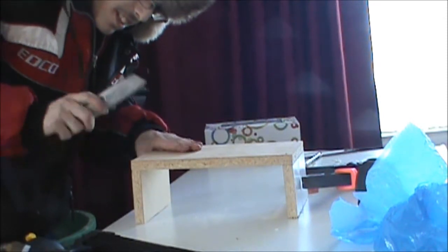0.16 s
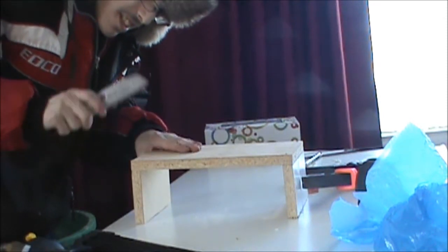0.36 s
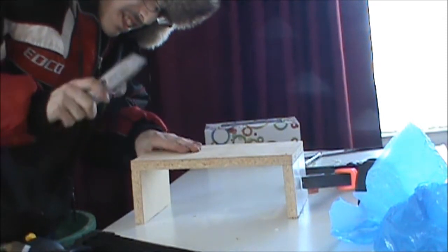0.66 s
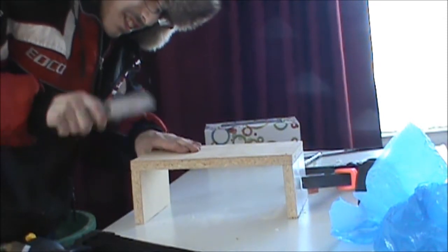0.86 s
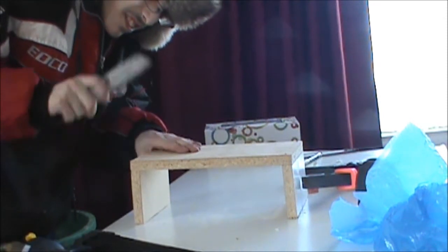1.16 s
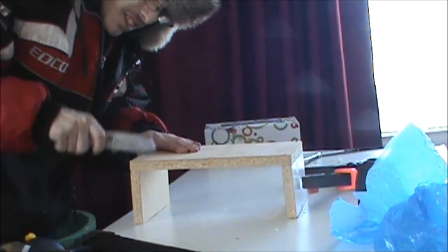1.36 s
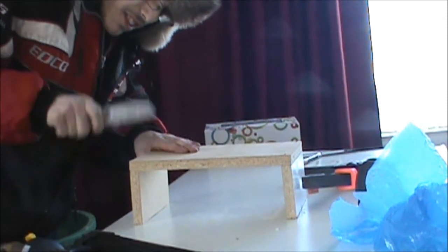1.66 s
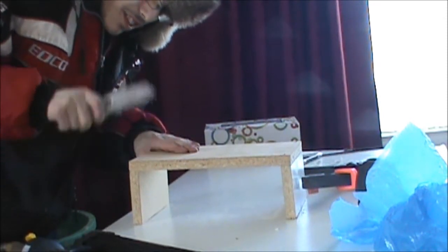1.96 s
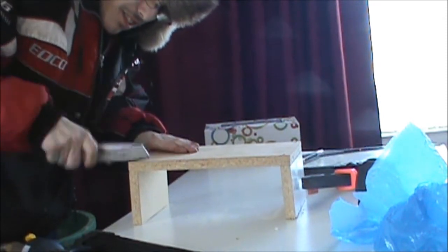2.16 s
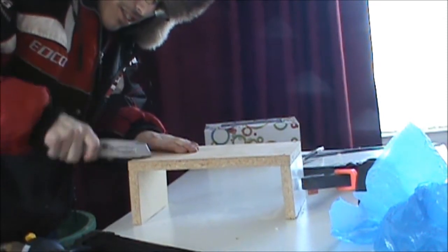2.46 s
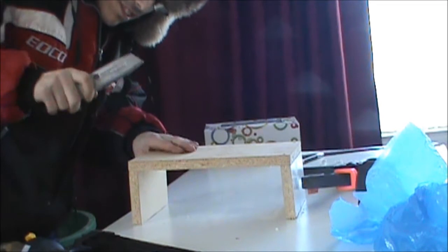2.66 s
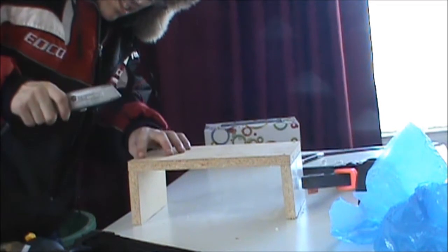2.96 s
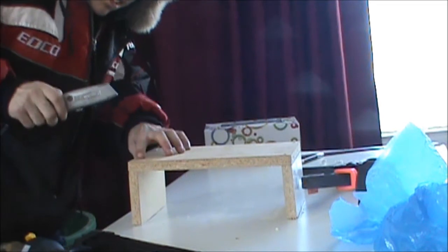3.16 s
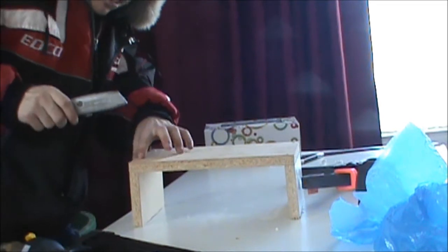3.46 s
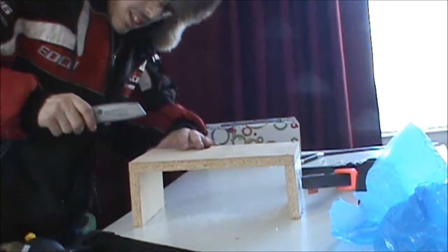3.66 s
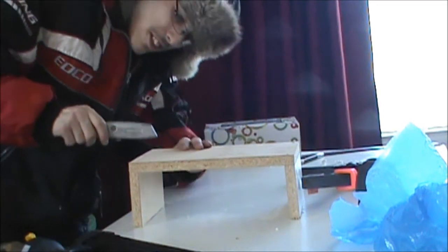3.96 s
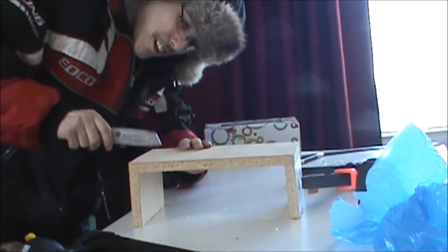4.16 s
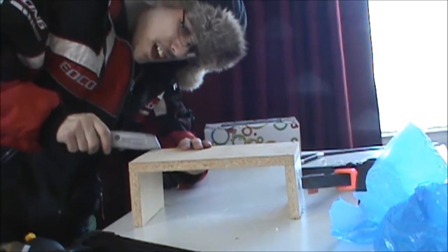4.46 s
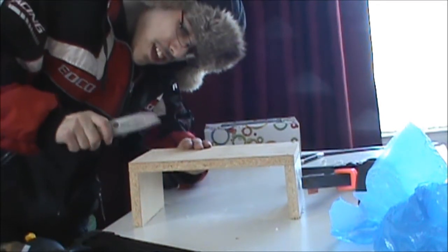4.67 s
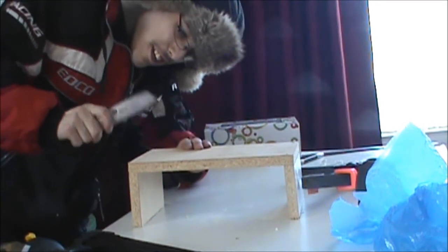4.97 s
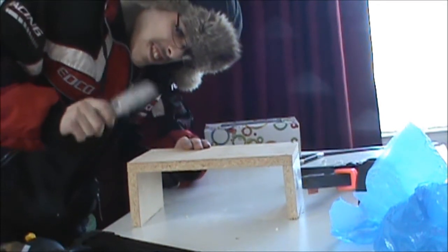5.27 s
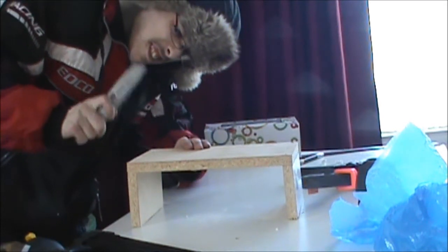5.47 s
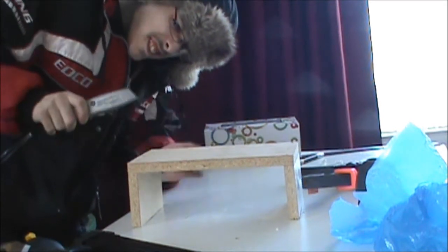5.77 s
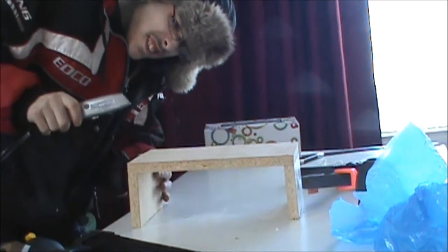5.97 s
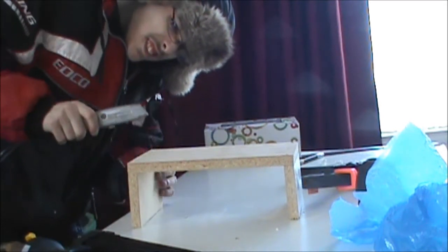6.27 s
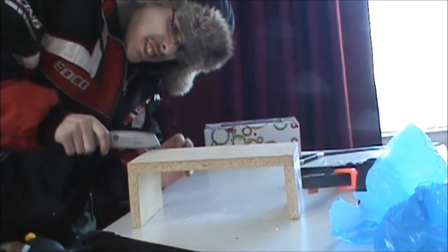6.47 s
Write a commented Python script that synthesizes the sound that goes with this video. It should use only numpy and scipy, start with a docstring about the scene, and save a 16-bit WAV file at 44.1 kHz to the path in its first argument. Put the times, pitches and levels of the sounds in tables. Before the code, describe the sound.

Close up in a small workroom, a steel tool clinks, then strikes a hollow chipboard bench in an even run of loud, boomy knocks. A hand rubs and bumps the wood in the pause. A bright steel clink opens a faster run that grows louder and sharper, then stops. Faint room hum remains, with light handling and one small knock.

```python
"""Two quick runs of hammer blows on a small chipboard bench, then one light knock, in a workroom.
Each blow adds a dry knock, the bench ringing in the room, a bass boom and the click and song of steel.
The steel tool also clinks and ticks on its own: short cracks of noise with a few dying tones.
A hand and sleeve rub and bump the board (shaped noise) over a quiet room of noise and steady hum.
A limiter flattens the loud blows, so the room swells up behind them."""
import sys
import numpy as np
from scipy import signal
from scipy.fft import rfft, irfft, next_fast_len
from scipy.io import wavfile
from scipy.ndimage import map_coordinates

SR = 44100
rng = np.random.default_rng(int(sys.argv[2]) if len(sys.argv) > 2 else 0)


def generate_wav(signal):
    """Clip the signal to [-1, 1] and save it as 16-bit WAV at the path in sys.argv[1]."""
    frames = np.transpose(np.atleast_2d(signal))
    scaled = np.clip(frames, -1, 1) * 32767
    pcm = np.round(scaled).astype(np.int16)
    wavfile.write(sys.argv[1], SR, pcm)


N = 291942
LENGTH = SR * 3 // 4  # samples in one short sound
AGE = np.arange(LENGTH) / SR  # seconds since that sound began

# blows on the board: (time [s], force [dB], dry knock before its common level [dB], centre of the knock [Hz])
BLOWS = [(.001, -50, -33, 700), (0.243, .5, -3, 804), (0.5071, 2, 6, 1000), (0.7659, 3, 2, 1100),
         (1.033, 0, 2.5, 1200), (1.305, 1.5, 6, 962), (1.5791, 1.5, 0, 1198), (1.8586, 1.5, -1.5, 1222),
         (2.1409, -0.85, 1, 1207), (2.4195, 1, -1.5, 1190), (4.2892, -19.5, 12.5, 3390),
         (4.4275, -11, -8, 726), (4.5768, -7.5, -15.5, 825), (4.7201, -6.5, 4, 866), (4.87, -5, 6, 1057),
         (5.0265, -2.5, 7, 1263), (5.181, -1.2, 10, 1815), (5.3427, -0.8, 7, 2097),
         (5.4998, -3, 13.5, 2090), (6.484, -37, 5.5, 2100)]
# ringing tones of the bench, with their relative level for a blow at each spot:
# (frequency [Hz], end [dB], middle [dB], in between [dB], near edge [dB])
BOARD = [(75.6, -10.5, -18, -13.5, -18), (108.6, -4, -11.5, 1, -10.5), (140.5, 1, -4, 1, -1),
         (172, -19.5, -11.5, -2.5, -1.5), (221, -15.5, -18.5, -23, -2.5), (366.8, -7.5, -11.5, -3, 6),
         (408.3, 2.5, -4.5, -1, 8), (426, -17.5, -9.5, 4, -6), (466.3, -1.5, 7.5, 1, 8.5),
         (510, 9.5, 3.5, 7, 3), (671.6, 3.5, -17.5, -11, -8), (725, -14.5, -10.5, -6, -13),
         (759.5, -7, -5.5, 3.5, -27), (810, -10, -4, -3, -7.5), (855, -4.5, -2, -3, -6),
         (960, -2.5, -13.5, -13.5, -2.5), (1048, 3, 3, 0, 3), (1282, 0, -20.5, -2, -27),
         (1547, -17.5, -25.5, -4.5, -14.5), (1593, -2, -23.5, 1.5, -10), (1640, -32, -21.5, -9, -15),
         (1720, 4.5, -23, -9.5, -23), (1954, 4, -19.5, -6, -2), (2038, -1, -13, -4.5, 2),
         (2088, -3.5, -2, -13.5, -7), (3040, -13, 2, -23, -7), (4140, -6, -4, -15.5, -22),
         (4220, -18.5, -7.5, -14, -28)]
# how long the room sound takes to die by 60 dB: (frequency [Hz], decay time [s])
ROOM = [(60, 0.52), (150, 0.23), (420, 0.33), (1100, 0.3), (2500, 0.33), (5000, 0.31), (9000, 0.24),
        (15000, 0.19)]


def amp(db):
    """Turn decibels into a gain."""
    return 10 ** (np.asarray(db) / 20)


def unit(x):
    """Scale a sound to an rms level of 1."""
    return x / np.sqrt(np.mean(x ** 2) + 1e-20)


def along(points, hz):
    """Read a (frequency, value) curve, with frequency on a log axis as we hear it."""
    f, v = np.transpose(points)
    return np.interp(np.log(hz + 1), np.log(f + 1), v)


def fade(t60, t=AGE):
    """Exponential decay that has lost 60 dB after t60 seconds."""
    return np.exp(-np.log(1000) * t / t60)


def add(track, s, sound):
    """Mix a stereo sound into the track, starting at s seconds."""
    start = max(round(s * SR), 0)
    part = track[:, start:][:, :sound.shape[-1]]
    part += sound[..., :part.shape[1]]


def band(x, low_hz, high_hz):
    """The part of a sound between two frequencies, without delaying it."""
    sos = signal.butter(2, [low_hz, high_hz], "band", fs=SR, output="sos")
    return signal.sosfiltfilt(sos, x, padtype=None)


def noise(spectrum, size):
    """Coloured stereo noise of rms 1; the two channels are less alike where the room mixes them more."""
    # likeness of the two channels: (frequency [Hz], coherence [0 to 1])
    likeness = [(100, 0.93), (300, 0.79), (600, 0.6), (2000, .63), (5000, 0.35), (12000, 0.62)]
    hz = np.fft.rfftfreq(size, 1 / SR)
    turn = np.arccos(np.clip(along(likeness, hz), 0, 1)) / 2
    shares = [np.cos(turn), np.sin(turn)]  # shared middle, opposed sides
    white = rfft(rng.standard_normal((2, size)))
    mid, side = irfft(white * amp(along(spectrum, hz)) * shares, size)
    return unit(np.array([mid + side, mid - side]))


def ripple(spectrum, depth_db, spacing_hz):
    """Tones bunch together: random peaks and valleys on a smooth curve, at full depth above 2 kHz."""
    hz = np.linspace(0, SR / 2, 4096)
    peaks = map_coordinates(rng.standard_normal(2048), [hz / spacing_hz], mode="mirror")
    depth = depth_db * np.minimum(hz / 2000, 1)
    return np.column_stack([hz, along(spectrum, hz) + depth * peaks])


def swell(hz, t):
    """Echoes take time to gather, so each pitch builds up at its own speed."""
    # time constant of the build-up: (frequency [Hz], time [s])
    build_up = [(110, 0.01), (250, 0.007), (480, 0.031), (900, 0.0043), (1500, 0.0024), (3000, .001)]
    return 1 - np.exp(-(t + 0.0012) / along(build_up, hz)[:, None])


def reverberant(spectrum):
    """Noise for a crowd of weak tones, each pitch swelling and dying at the room's speed."""
    hz, t, z = signal.stft(noise(spectrum, LENGTH), SR, nperseg=512)
    shaped = z * swell(hz, t) * fade(along(ROOM, hz)[:, None], t)
    return signal.istft(shaped, SR, nperseg=512)[1][:, :LENGTH]


def ring(hz, db, t60, spread):
    """Dying tones (damped modes); the higher ones differ more in phase between the channels."""
    phase = rng.uniform(0, 2 * np.pi, (len(hz), 1))
    skew = spread * rng.standard_normal((len(hz), 1)) * np.minimum(hz / 700, 1)[:, None]
    decay = amp(db)[:, None] * fade(t60[:, None]) * swell(hz, AGE)
    turning = 2 * np.pi * hz[:, None] * AGE + phase
    return np.array([(decay * np.sin(turning + side * skew)).sum(0) for side in (-1, 1)])


def room_tone(air_db=-59):
    """The quiet room: low rumble and hiss from shaped noise, and a faint hum of steady tones."""
    # colour of the air noise: (frequency [Hz], relative level [dB per Hz])
    air_colour = [(25, -21), (60, -17), (110, -3.5), (190, -15.5), (300, -21.5), (380, -14.5), (480, -19),
                  (1000, -21.5), (2000, -24.5), (4750, -28), (9500, -27), (15000, -27)]
    # steady electrical tones: (frequency [Hz], level [dB])
    hum_tones = [(113, -75.5), (371.4, -72), (15735, -79)]
    t = np.arange(N) / SR
    hum = sum(np.sqrt(2) * amp(db) * np.sin(2 * np.pi * hz * t) for hz, db in hum_tones)
    return amp(air_db) * noise(air_colour, N) + hum


def handling(bump_db=5, sleeve_db=-1, ripple_db=2):
    """Hand and sleeve: rubs swell and fade in uneven scuffs; bumps are low thuds, heel then fingers."""
    # rubs: (middle [s], width of the swell [s], level before sleeve_db [dB], tilt [dB per octave])
    rubs = [(.06, 0.84, -44.5, 0.5), (3.087, .16, -50, -2), (3.271, 0.14, -47.5, -1),
            (3.46, 0.073, -49.5, 0.5), (3.68, 0.22, -56.5, -1), (3.945, .24, -56, 0),
            (6.307, 0.097, -58.5, 4.5), (6.497, 0.23, -59, -2)]
    # colour of the cloth before its tilt: (frequency [Hz], relative level [dB per Hz])
    cloth_colour = [(100, 0.5), (500, 0), (1500, -6.5), (3000, -12), (10000, -16.5), (16000, -22)]
    # the hand comes down on the bench: (time [s], level before bump_db [dB])
    bumps = [(3.063, -44), (3.374, -43), (3.418, -46.5), (3.795, -53), (5.944, -52), (6.584, -49.5)]
    # colour of a bump: (frequency [Hz], relative level [dB per Hz])
    bump_colour = [(24, -51), (40, 3), (70, -49), (102, -6), (165, 4), (212, -14), (366, -14), (900, -30),
                   (1170, -52), (1980, -120)]
    fingers_lag_s, fingers_db = .035, -7  # the fingers follow the heel of the hand
    scuff_db = 2.5  # unevenness of a rub
    t = np.arange(N) / SR
    scuffs = map_coordinates(rng.standard_normal(400), [t * 28], mode="mirror")
    out = np.zeros((2, N))
    for s, length, db, tilt in rubs:
        tilted = [(hz, level + tilt * np.log2(hz)) for hz, level in cloth_colour]
        cloth = ripple(tilted, ripple_db, spacing_hz=285)
        stroke = np.exp(-2 * ((t - s) / length) ** 2)
        rustle = noise(cloth, next_fast_len(N))[:, :N]
        out += amp(db + sleeve_db + scuff_db * scuffs) * stroke * rustle
    for s, db in bumps:
        for lag, touch_db in [(0, 0), (fingers_lag_s, fingers_db)]:
            thud = noise(bump_colour, LENGTH) * fade(0.31) * (1 - np.exp(-AGE / 0.0023))
            add(out, s + lag, amp(db + touch_db + bump_db) * thud)
    return out


def steel(ring_db, crack_t60, room_db):
    """One contact of the tool: a short crack of noise, the steel's own ring and a little room."""
    # tones of the tool: (frequency [Hz], level before a random change [dB], decay time [s])
    steel_tones = [(2860, -13, .08), (3750, -11, .08), (4110, -8, .1), (4400, -5, .09), (4900, -6, .1),
                   (5050, -5, .04), (5500, -8, .09), (5620, -6, .08), (6340, -7, .09), (8300, -10, .09),
                   (9140, -10, .1), (9900, -6, .1), (10830, -5, .08), (13176, -11, .08), (14800, -15, .08)]
    # crack of steel meeting wood: (frequency [Hz], relative level [dB per Hz])
    crack_colour = [(300, -29), (2000, -11.5), (4000, -2.5), (6000, 3.5), (8000, -3), (10500, 3),
                    (13000, -4), (16000, -10.5)]
    hz, db, t60 = np.transpose(steel_tones)
    modes = ring(hz, db + rng.normal(0, 2, len(hz)), t60, spread=0.1)
    crack = noise(crack_colour, LENGTH) * fade(crack_t60)
    direct = 0.42 * crack.mean(0) + 0.2 * crack  # mostly central
    return direct + amp(ring_db) * modes + amp(room_db) * reverberant(crack_colour)


def spot(spectrum, mode_db, crowd_db, ring_db, dry_ring_db, ripple_db):
    """The bench struck at one spot: its long ring in the room, its short dry knock, and its colour."""
    # dry knock under the tool: (frequency [Hz], relative level [dB per Hz])
    knock_colour = [(100, -25), (400, -13), (800, -22), (1200, -1), (2000, 2), (3000, -19), (5000, -19.5),
                    (15000, -54)]
    hz = np.transpose(BOARD)[0]
    colour = ripple(spectrum, ripple_db, spacing_hz=71.3)
    modes = ring(hz, mode_db, 0.86 * along(ROOM, hz), spread=0.1)
    dry_modes = ring(hz, mode_db, np.full(len(hz), .12), spread=0.17)
    dry_noise = noise(ripple(knock_colour, ripple_db, spacing_hz=119), LENGTH) * fade(0.027)
    knock = dry_noise + amp(dry_ring_db) * dry_modes
    answer = amp(crowd_db) * reverberant(colour) + amp(ring_db) * modes
    return answer, knock, colour


def hammering(fresh_db=-3, click_db=0, dry_db=-4, bass_db=3, boom_db=-34, click_rise_s=0.00015):
    """Blows set the board ringing; the first on a spot click and sing most, dry ones sound less hollow."""
    # when the tool moves to the board's end, its middle, a spot between them, and its near edge: [s]
    moves = [0, 4, 4.65, 6]
    # crowds of weaker tones at those four spots, each: (frequency [Hz], relative level [dB per Hz])
    at_end = [(24, -59.5), (40, -31.5), (103, -1.5), (247, -4), (325, -6.5), (377, 4), (484, 0.5),
              (522, 2.5), (577, -1), (670, 0.5), (1190, -3), (2060, -2.5), (7520, -27), (10900, -22.5),
              (15500, -32.5)]
    at_middle = [(24, -69.5), (40, -34.5), (106, -5), (280, -13.5), (461, -2.5), (548, -11), (859, -13),
                 (2640, -21), (2990, -17), (4030, -14), (5170, -29), (5720, -19), (7710, -25),
                 (12100, -28.5), (15500, -33.5)]
    between = [(24, -57.5), (40, -24.5), (103, -0.5), (150, 3.5), (235, -4.5), (317, -2.5), (359, 2),
               (522, 2.5), (562, 1.5), (740, 1.5), (1380, -1), (1960, -2.5), (7710, -21.5), (10900, -21.5),
               (15500, -26)]
    at_edge = [(50, -23), (130, 1), (250, -4), (450, 8.5), (800, -4.5), (2100, -7), (3100, -8),
               (4000, -16.5), (5500, -11), (9000, -39), (15000, -42)]
    # tone at those spots, before the shared settings and changes from blow to blow:
    # (thump [dB], hollow body [dB], click [dB], singing [dB])
    tones = [(-2.5, -4, -0.5, -20), (-3.5, -5, 3.5, -10), (-2.5, -0.5, 0.5, -16.5), (-4, -2, -13, -37)]
    # the tool sings on after a blow: (frequency [Hz], relative level [dB], decay time [s])
    song = [(3079, -6, .28), (4113, 0, .36), (4290, -2, .36), (6320, -11, .35)]
    # bass boom that lingers under each blow: (frequency [Hz], relative level [dB per Hz])
    boom_colour = [(40, -28.5), (80, -11.5), (110, -2), (155, 2), (230, -19.5), (450, -26.5), (900, -48),
                   (2000, -90.5)]
    # the first blow on a spot is hollower and clicks more; this wears off over a few blows
    first_body_db, first_click_db, settle_blows = 3.5, 10, 5.4
    body_per_knock = .22  # dB of hollow body lost for each dB of dry knock
    centre_db, centre_octaves = 2, 0.45  # lift and half width of the band around the knock's centre

    _, end_db, middle_db, between_db, edge_db = np.transpose(BOARD)
    spots = [spot(at_end, end_db, crowd_db=3.0, ring_db=-14.5, dry_ring_db=-13.5, ripple_db=2.0),
             spot(at_middle, middle_db, crowd_db=3, ring_db=-9.5, dry_ring_db=-6.5, ripple_db=1.0),
             spot(between, between_db, crowd_db=1, ring_db=-11.0, dry_ring_db=-23, ripple_db=1.0),
             spot(at_edge, edge_db, crowd_db=-9.5, ring_db=-19, dry_ring_db=-2.5, ripple_db=2.5)]
    places = np.searchsorted(moves[1:], np.transpose(BLOWS)[0])
    out = np.zeros((2, N))
    for k, (s, force_db, knock_db, centre_hz) in enumerate(BLOWS):
        answer, knock, colour = spots[places[k]]
        thump_db, body_db, bright_db, singing_db = tones[places[k]]
        blows_before = np.sum(places[:k] == places[k])
        early = np.exp(-blows_before / settle_blows)
        # a small shift of the contact point brings fresh sound above the lowest tones
        fresh = band(reverberant(colour), 300, 14000)
        wood = answer + amp(fresh_db) * fresh + amp(dry_db + knock_db) * knock
        width = 2 ** centre_octaves
        wood = wood + (amp(centre_db) - 1) * band(wood, centre_hz / width, centre_hz * width)
        singing = amp(singing_db) * early * ring(*np.transpose(song), spread=.4)
        # a gain minus 1, added to the wood, lifts or lowers just that band
        thump = (amp(thump_db + bass_db) - 1) * band(wood, 30, 220)
        hollow_db = body_db + first_body_db * early - body_per_knock * knock_db
        body = (amp(hollow_db) - 1) * band(wood, 210, 940)
        boom = amp(boom_db) * noise(boom_colour, LENGTH) * fade(0.88)
        click = steel(ring_db=-22.5, crack_t60=0.014, room_db=-16.5)
        click = amp(click_db + bright_db + first_click_db * early) * click
        blow = wood + thump + body + boom + singing
        add(out, s, amp(force_db) * blow * (1 - np.exp(-AGE / 0.00042)))
        add(out, s + .0006, amp(force_db) * click * (1 - np.exp(-AGE / click_rise_s)))
    return out


def clinks(level_db=1, tick_ring_db=-27):
    """Loose steel clinks, and dull ticks on wide swings: at the turn and just before the blow."""
    # single clinks and bounces of the tool: (time [s], level before level_db [dB])
    clink_times = [(.1595, -17.5), (.1685, -13.5), (.2365, -16.5), (3.0516, -49), (4.292, -4),
                   (6.615, -35.5)]
    # the arm swings high between these two times: [s]
    wide_swings = (.9, 2.6)
    rattle_lead_s, rattle_db = .058, -31  # the tool rattles at the turn of a wide swing
    graze_lead_s, graze_db = .0057, -24  # and grazes the board just before it lands
    tick_scatter_db = 2  # random spread of the ticks' strength
    swings = [s for s, *_ in BLOWS if wide_swings[0] < s < wide_swings[1]]
    rattles = [(s - rattle_lead_s, rattle_db) for s in swings]
    grazes = [(s - graze_lead_s, graze_db) for s in swings[:-1]]
    out = np.zeros((2, N))
    for s, db in clink_times:
        clink = steel(ring_db=-17, crack_t60=.028, room_db=-17)
        add(out, s, amp(db + level_db) * clink * (1 - np.exp(-AGE / 0.0005)))
    for s, db in rattles + grazes:
        strength = amp(db + tick_scatter_db * rng.standard_normal())
        add(out, s, strength * steel(tick_ring_db, crack_t60=0.027, room_db=-18))
    return out


def scene():
    """Everything heard at the bench, a hair louder on the left, over the quiet room."""
    balance = amp([[.1], [-.1]])
    return (hammering() + clinks() + handling()) * balance + room_tone()


def limiter(x, ceiling_db, release_db_per_s, attack):
    """The gain drops quickly (attack in s) at a loud peak and climbs back at a steady rate."""
    excess = np.maximum(20 * np.log10(np.abs(x).max(0) + 1e-9) - ceiling_db, 0)
    climb = release_db_per_s * np.arange(N) / SR
    cut = np.maximum.accumulate(excess + climb) - climb
    keep = np.exp(-1 / (attack * SR))
    smooth_cut = signal.lfilter([1 - keep], [1, -keep], cut)
    return x * amp(-smooth_cut)


def record(dry):
    """Thin out deep bass, limit, round off what overshoots and remove the highest treble."""
    top_hz = 15900
    lean = signal.sosfilt(signal.butter(2, 55, "high", fs=SR, output="sos"), dry)
    held = limiter(lean, ceiling_db=-1, release_db_per_s=165, attack=0.00008)
    rounded = held / (1 + np.abs(held / .95) ** 6) ** (1 / 6)
    return irfft(rfft(rounded) * (np.fft.rfftfreq(N, 1 / SR) < top_hz), N)


dry = scene()
out = record(dry)
generate_wav(out)
```